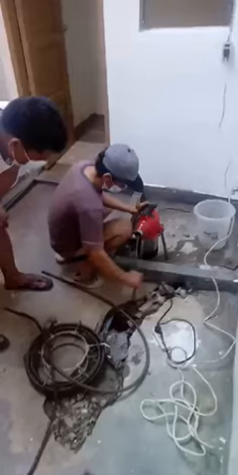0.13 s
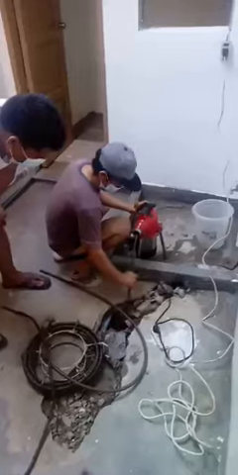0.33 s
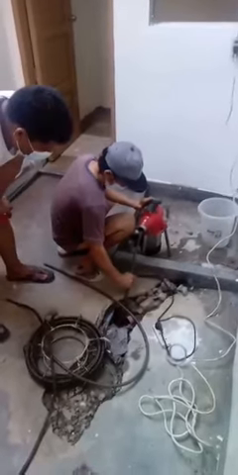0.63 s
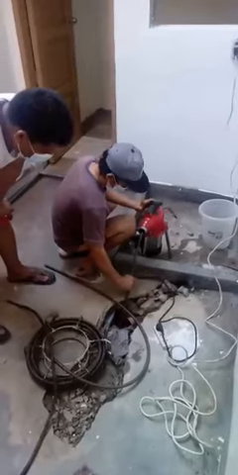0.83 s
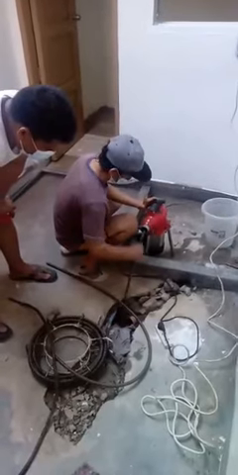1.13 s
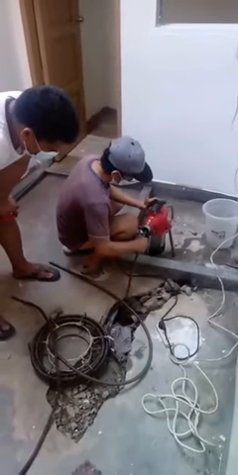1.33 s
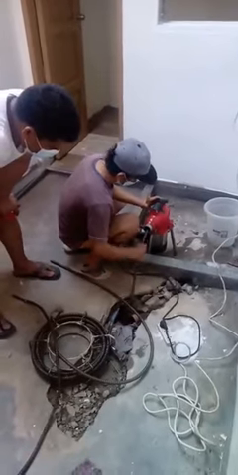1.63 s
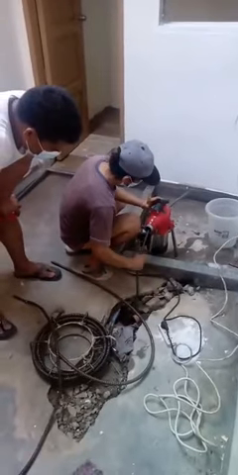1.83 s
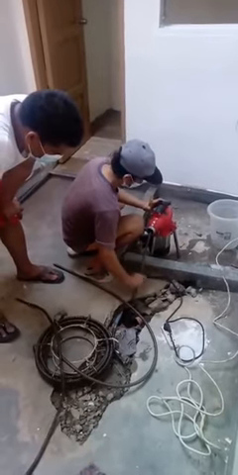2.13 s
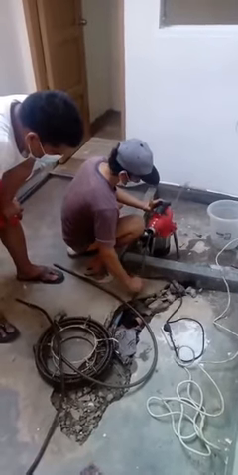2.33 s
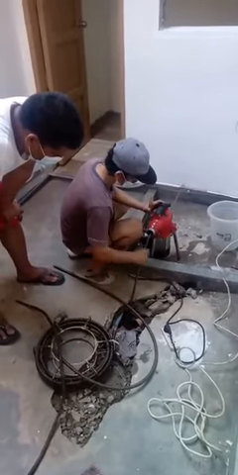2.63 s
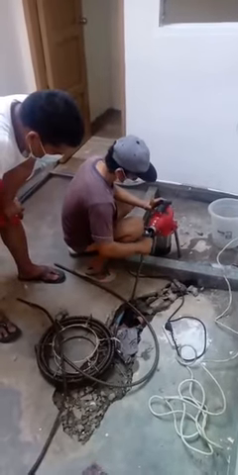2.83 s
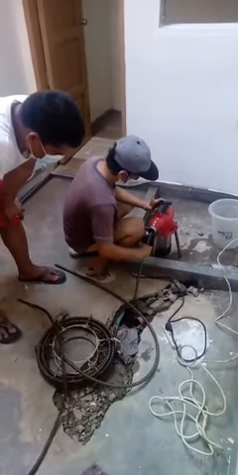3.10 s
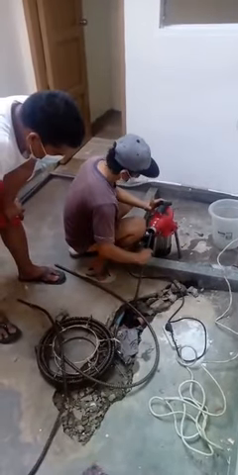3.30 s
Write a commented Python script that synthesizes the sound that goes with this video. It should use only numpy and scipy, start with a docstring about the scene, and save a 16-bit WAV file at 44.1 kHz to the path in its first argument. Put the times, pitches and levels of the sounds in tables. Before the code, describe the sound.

A drain-cleaning machine fades in over the first 0.25 s and runs to the end at about 3.5 s. A steady motor whine near 1.9 kHz, dipping around 2.0-2.3 s, sits over faint hum, dense steel rattle and hollow drumming pulsing eight times a second. Thumps and rasping scrapes gather at 1.4-2.0 s, with scattered thin squeaks and light late scrapes. Bare room, short reverb, weak bass.

```python
"""A hard-walled room, with a drain-cleaning machine running on the floor; the sound fades in at the start.
Its induction motor whines on multiples of the shaft speed, over a mains hum. The coiled steel cable turns
about eight times a second: random knocks drum, thump, rattle and chink in resonances of steel and housing.
Pulled by hand, the cable scrapes (bursts of clicks) and gives thin squeaks (bursts of narrow noise).
The microphone cuts the bass; on rattle, scrapes and squeaks the direct sound leads the reverb by 4.5 dB."""
import sys
import numpy as np
from scipy import signal
from scipy.fft import rfft, irfft
from scipy.io import wavfile

SR = 44100
rng = np.random.default_rng(int(sys.argv[2]) if len(sys.argv) > 2 else 0)


def inscribe(sig):
    """Save sig as 16-bit PCM at rate SR to the path in sys.argv[1].

    A 1-D sig is mono; a 2-D sig holds one channel per row.
    Samples are clipped to [-1, 1] before scaling.
    """
    pcm = np.round(np.clip(np.atleast_2d(sig).T, -1, 1) * 32767)
    wavfile.write(sys.argv[1], SR, pcm.astype(np.int16))


N = 152586
T = np.arange(N) / SR  # s

# All source levels are as they stand ahead of the microphone's fade-in gain.
# Motor tones [multiple of the shaft speed, level/dB]
MOTOR_ORDERS = [(15, -55), (16, -44.5), (19, -69), (30, -75), (31, -59), (32, -38.5), (33, -61),
                (36, -51.5), (37, -58.5), (40, -66), (44, -58.5), (47, -54.5), (48, -46.5), (49, -48),
                (53, -50.5), (61, -64), (79, -60), (80, -43.5), (81, -51), (83, -55.5), (97, -49.5),
                (112, -58), (132, -70)]
# Main whine and its once-a-turn sidebands [multiple of the shaft speed, level/dB]
WHINE_ORDERS = [(63, -54.5), (64, -34), (65, -45)]
# Gain of the main whine over time [t/s, level/dB]
WHINE_LEVEL = [(.27, -0.5), (.65, -2.5), (1.2, 1), (1.55, 1), (1.85, -3), (2.05, -10), (2.27, -13),
               (2.4, 0.5), (2.95, -2.5), (3.12, -8.5), (3.46, -3.5)]
# Throb with each cable turn, for motor tones, whine, drumming and rattle
# [depth once a turn/dB, its peak t/s, depth twice a turn/dB, its peak t/s]
TONE_THROB = (1.0, .036, 1.2, .024)
WHINE_THROB = (1.7, .018, .6, .006)
DRUM_THROB = (1.34, 0.03, 0.39, 0.068)
RATTLE_THROB = (0.54, 0.015, 0.4, 0.0048)
# Spectrum of the coil rattle [f/Hz, level/dB per Hz]
RATTLE_SPECTRUM = [(25, -32), (48, -42), (85, -19), (200, 0), (380, 3.5), (590, 2), (720, -7.5), (1000, 0),
                   (1300, -7), (2000, -1), (2250, -6.5), (2700, -1.5), (3100, -8), (3800, -6), (4400, -15),
                   (6000, -19), (7000, -17), (7700, -15), (8600, -22), (10000, -30.5), (12000, -31),
                   (14000, -31)]
# Gain of the rattle and chinks over time [t/s, level/dB]
RATTLE_LEVEL = [(.25, 0), (.5, -1), (1, -2), (1.35, -2), (1.55, 1), (1.8, 3.5), (1.95, 0.5), (2.3, -1),
                (2.45, -0.5), (2.7, -1), (3.05, -1), (3.2, 1), (3.46, -0.5)]
# Resonances of the motor casing [f/Hz, width/Hz, level/dB]
CASING_MODES = [(446, 37, -7.5), (952, 68, -3.5), (1066, 28, -5), (1428, 35, 3.5), (1565, 25, -8.5),
                (1901, 84, 7.5), (2414, 74, -8.5), (2644, 31, -7), (2863, 53, -5)]
# Housing resonances that the cable drums on [f/Hz, width/Hz, level/dB]
HOUSING_MODES = [(92, 8.3, -20), (147.5, 26.5, -13), (193.8, 16.8, -2.5), (246.4, 20.4, 0),
                 (279.6, 24.6, 1.5), (321.5, 20, -7)]
# Gain of the drumming over time [t/s, level/dB]
DRUM_LEVEL = [(.25, 1.5), (.9, -1), (1.3, -1), (1.47, -0.5), (1.8, 0.5), (2.05, -2), (2.35, -0.5),
              (2.55, 1), (2.7, -2.5), (3.05, 1.5), (3.46, -0.5)]
# Harder thumps of the cable on the housing [t/s, f/Hz, level/dB]
THUMPS = [(.545, 247.3, -34.5), (1.06, 280, -33), (1.43, 240, -29), (1.473, 241.4, -32),
          (1.664, 272.6, -29.5), (1.774, 245, -29), (1.785, 85, -44), (1.91, 243, -33), (2.525, 245, -34.5),
          (2.93, 280, -37), (3.061, 265, -30)]
# High ring of the coils [f/Hz, width/Hz, level/dB]
SIZZLE_MODES = [(7660, 340, 2), (8250, 280, -3)]
# Scrapes of the cable in its guide [t/s, level/dB, decay/s]
SCRAPES = [(.69, -49, 0.061), (1.43, -33, 0.018), (1.5, -34.5, 0.062), (1.63, -39, 0.12),
           (1.75, -46.5, 0.053), (1.87, -42.5, 0.075), (2.0, -40, 0.034), (3.16, -44.5, 0.082),
           (3.39, -43.5, 0.031)]
# Spectrum of the scrapes [f/Hz, level/dB per Hz]
SCRAPE_SPECTRUM = [(800, -6), (2500, 5.5), (4000, 2), (5500, -2), (7000, 1.5), (7900, 5), (9000, -5),
                   (11000, -11.5), (14000, -9)]
# Thin squeaks of the steel [t/s, f/Hz, width/Hz, level/dB, decay/s]
SQUEAKS = [(.335, 9150, 600, -45, .04), (.335, 11100, 900, -46.5, 0.039), (.688, 7250, 507, -40.5, 0.0096),
           (.698, 2500, 300, -36, 0.0085), (0.697, 3570, 600, -35.5, 0.0056),
           (.955, 13400, 600, -56, 0.021), (1.13, 8140, 700, -47, 0.018), (1.367, 9300, 600, -46.5, 0.02),
           (2.005, 2630, 700, -35.5, .03), (2.25, 10000, 900, -49, 0.026), (2.443, 3720, 500, -34.5, 0.025),
           (2.695, 3700, 600, -40, .02), (2.76, 3170, 250, -38, 0.011), (2.968, 13200, 1000, -37.5, 0.032),
           (3.315, 1760, 300, -32.5, 0.0093)]
# Mains hum [multiple of the mains frequency, level/dB]
HUM_HARMONICS = [(2, -48.5), (4, -54)]
# Gain of the hum over time [t/s, level/dB]
HUM_LEVEL = [(.3, -6), (1.25, 1), (1.45, -7.5), (2.2, -8.5), (3.46, -6)]
# Gain of the whole sound as it fades in [t/s, level/dB]
FADE_IN = [(0, -120), (.078, -70), (.098, -23.5), (.15, -16.5), (.19, -8.5), (.25, 2.5)]

SHAFT_HZ, CABLE_HZ, MAINS_HZ = 29.785, 7.95, 60
SHAFT_DRIFT, SHAFT_SWAY = .00027, .0011  # shares of the speed: random (rms), and with each cable turn (peak)
TONE_FLUTTER, WHINE_FLUTTER, FLUTTER_HZ = 0.34, 0.16, 24  # rms share of the tone, and its rate
RATTLE_DB, CASING_DB, RATTLE_PER_S = -36.5, -39.5, 1500
DRUM_DB, DRUM_PER_S = -38, 600
THUMP_RISE_S, THUMP_DECAY_S, THUMP_WOBBLE = .018, .022, 0.0823  # wobble: rms share of the pitch
# Chinks: pitch range, level at its low end, change of level towards its high end
CHINK_LOW_HZ, CHINK_HIGH_HZ, CHINK_DB, CHINK_TILT_DB = 1101, 4113, -58.5, -3
CHINKS_PER_S, CHINK_T60_S = 5, 0.14  # at each pitch
SIZZLE_DB = -59
SCRAPE_RISE_S, SQUEAK_RISE_S = .006, .014
ROOM_T60_S, ROOM_DB = 0.4, -4.5  # reverb relative to the direct sound
LOW_CUT_HZ, HIGH_CUT_HZ = 53, 14100


def amp(db):
    """Decibels to gain."""
    return 10 ** (np.asarray(db) / 20)


def unit(x):
    """Scales to rms 1."""
    return x / np.sqrt(np.mean(abs(x) ** 2) + 1e-20)


def level(points):
    """Gain over time from [t/s, level/dB] points."""
    return amp(np.interp(T, *np.transpose(points)))


def colour(x, points):
    """Filters by a [f/Hz, level/dB] spectrum, then scales to rms 1."""
    hz, db = np.transpose(points)
    f = np.fft.rfftfreq(N, 1 / SR)
    gain = amp(np.interp(np.log(f + 1), np.log(hz), db))
    return unit(irfft(rfft(x) * gain, N))


def ring(x, modes):
    """Passes x through steep-sided resonances [f/Hz, width/Hz, level/dB], then scales to rms 1."""
    f = np.fft.rfftfreq(N, 1 / SR)
    response = 0
    for hz, width, db in modes:
        response = response + amp(db) / (1 + 1j * (f - hz) / (width / np.sqrt(2))) ** 2
    return unit(irfft(rfft(x) * response, N))


def drift(rate_hz):
    """Random wander of rms 1, mostly slower than the rate."""
    f = np.fft.rfftfreq(N, 1 / SR)
    return unit(irfft(rfft(rng.standard_normal(N)) / (1 + (f / rate_hz) ** 2), N))


def clicks(per_s, spread_db):
    """Random contacts of uneven strength and either sign, scaled to rms 1."""
    size = amp(spread_db * np.minimum(rng.exponential(1, N), 4))
    sign = rng.choice([-1, 1], N)
    struck = rng.random(N) < per_s / SR
    return unit(size * sign * struck)


def swing(once_db, once_s, twice_db, twice_s):
    """The cable bears harder once and twice in each of its turns."""
    turn = 2 * np.pi * CABLE_HZ
    once = once_db * np.cos(turn * (T - once_s))
    twice = twice_db * np.cos(2 * turn * (T - twice_s))
    return amp(once + twice)


def burst(start, rise, decay):
    """A quick straight rise, then an exponential fall; all times in s."""
    age = np.maximum(T - start, 0)
    return np.minimum(age / rise, 1) * np.exp(-np.maximum(age - rise, 0) / decay)


def shaft_tones(orders, flutter, turns):
    """Tones on multiples of the shaft speed, each fluttering in level and phase."""
    out = np.zeros(N)
    for order, db in orders:
        shake = unit(1 + flutter * (drift(FLUTTER_HZ) + 1j * drift(FLUTTER_HZ)) / np.sqrt(2))
        tone = shake * np.exp(2j * np.pi * (order * turns + rng.random()))
        out += amp(db) * np.sqrt(2) * tone.real
    return out


def motor():
    """Tones locked to a shaft whose speed drifts and sways by a small share with each cable turn."""
    sway = SHAFT_SWAY * np.sin(2 * np.pi * CABLE_HZ * T)
    speed = SHAFT_HZ * (1 + SHAFT_DRIFT * drift(1) + sway)
    turns = np.cumsum(speed) / SR
    tones = shaft_tones(MOTOR_ORDERS, TONE_FLUTTER, turns) * swing(*TONE_THROB)
    whine = shaft_tones(WHINE_ORDERS, WHINE_FLUTTER, turns) * swing(*WHINE_THROB)
    return tones + whine * level(WHINE_LEVEL)


def drumming():
    """The whirling cable knocks on the housing, exciting its low resonances."""
    knocks = clicks(DRUM_PER_S, spread_db=3.0) * swing(*DRUM_THROB)
    return amp(DRUM_DB) * ring(knocks, HOUSING_MODES) * level(DRUM_LEVEL)


def thumps():
    """The housing booms briefly, at a wavering pitch, when the cable whips against it."""
    out = np.zeros(N)
    for start, hz, db in THUMPS:
        cycles = np.cumsum(hz * (1 + THUMP_WOBBLE * drift(rate_hz=59.8))) / SR
        boom = np.sqrt(2) * np.sin(2 * np.pi * cycles)
        out += amp(db) * burst(start, THUMP_RISE_S, THUMP_DECAY_S) * boom
    return out


def rattle():
    """Dense contacts of the coils over noise, beside contacts that set the casing ringing."""
    contacts = unit(clicks(RATTLE_PER_S, spread_db=1.5) + 0.86 * rng.standard_normal(N))
    contacts = contacts * swing(*RATTLE_THROB) * amp(0.83 * drift(rate_hz=13))
    coils = amp(RATTLE_DB) * room(colour(contacts, RATTLE_SPECTRUM)) * level(RATTLE_LEVEL)
    casing = amp(CASING_DB) * ring(clicks(RATTLE_PER_S, spread_db=2.5), CASING_MODES)
    return coils + casing


def chinks(count=30):
    """Each stretch of coil rings briefly at its own pitch when struck, under a steady high sizzle."""
    t, out = T[:SR // 5], np.zeros(N)
    for place in (np.arange(count) + rng.random(count)) / count:  # 0 to 1, low to high pitch
        hz = CHINK_LOW_HZ * (CHINK_HIGH_HZ / CHINK_LOW_HZ) ** place
        decay = amp(-60 * t / CHINK_T60_S)
        note = np.sin(2 * np.pi * hz * t) * decay * np.minimum(t / .004, 1)  # 4 ms rise
        struck = signal.oaconvolve(clicks(CHINKS_PER_S, spread_db=1), note)[:N]
        out += amp(CHINK_DB + CHINK_TILT_DB * place) * unit(struck)
    sizzle = amp(SIZZLE_DB) * ring(clicks(RATTLE_PER_S, spread_db=4), SIZZLE_MODES)
    return (out + sizzle) * level(RATTLE_LEVEL)


def scrapes():
    """Coils rasp over the guide in uneven clumps as the cable is pulled through."""
    force = sum(amp(db) * burst(start, SCRAPE_RISE_S, decay) for start, db, decay in SCRAPES)
    rasp = colour(clicks(per_s=3000, spread_db=0.5), SCRAPE_SPECTRUM)
    return rasp * force * amp(1.1 * drift(rate_hz=56))


def squeaks():
    """Brief stick-slip of steel on steel, as bursts of narrow-band noise."""
    out = np.zeros(N)
    for start, hz, width, db, decay in SQUEAKS:
        squeal = ring(rng.standard_normal(N), [(hz, width, 0)])
        out += amp(db) * burst(start, SQUEAK_RISE_S, decay) * squeal
    return out


def hum():
    """Magnetic hum of the windings on even multiples of the mains frequency."""
    out = np.zeros(N)
    for multiple, db in HUM_HARMONICS:
        cycles = multiple * MAINS_HZ * T + rng.random()
        out += amp(db) * np.sqrt(2) * np.sin(2 * np.pi * cycles)
    return out * level(HUM_LEVEL)


def room(x):
    """Adds the short decaying-noise tail of bare walls, roughly keeping the level."""
    t = T[:SR // 2]
    tail = rng.standard_normal(len(t)) * amp(-60 * t / ROOM_T60_S) * (t > .004)  # starts after 4 ms
    wet = signal.fftconvolve(x, tail / np.linalg.norm(tail))[:N]
    return (x + amp(ROOM_DB) * wet) / np.hypot(1, amp(ROOM_DB))


def scene():
    """The machine and its cable in the room, on one channel."""
    machine = motor() + drumming() + thumps() + rattle() + chinks()
    pulled_cable = room(scrapes() + squeaks())
    return (machine + pulled_cable + hum())[None]


def record(dry):
    """The microphone's bass cut, a fade-in, then the upper band limit."""
    bass_cut = signal.butter(3, LOW_CUT_HZ, "high", fs=SR, output="sos")
    heard = signal.sosfilt(bass_cut, dry)
    lowpass = signal.firwin(511, HIGH_CUT_HZ, window=("kaiser", 9), fs=SR)
    return signal.oaconvolve(heard * level(FADE_IN), lowpass[None], "same")


dry = scene()
out = record(dry)
inscribe(out)
```